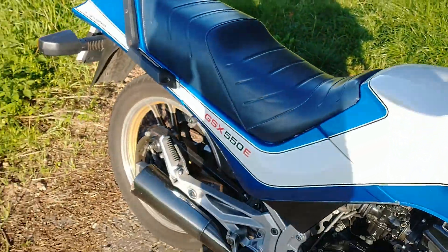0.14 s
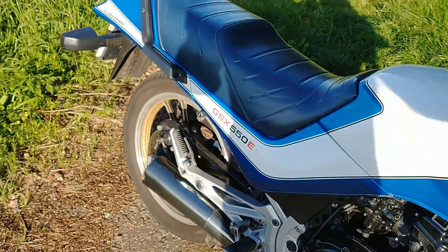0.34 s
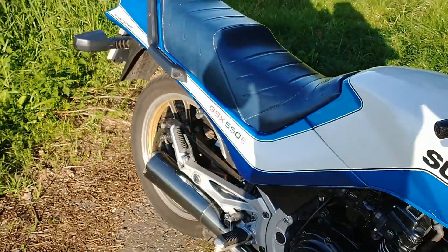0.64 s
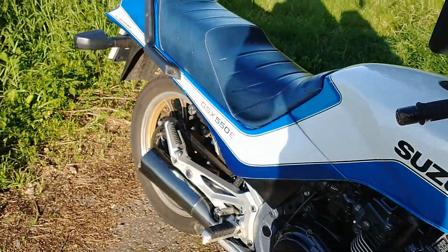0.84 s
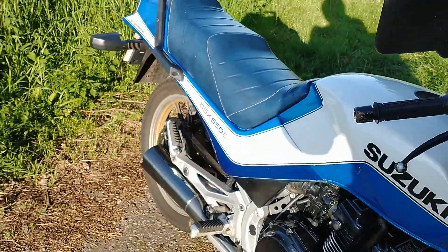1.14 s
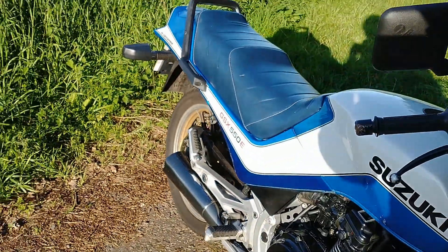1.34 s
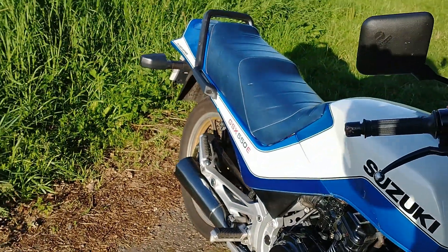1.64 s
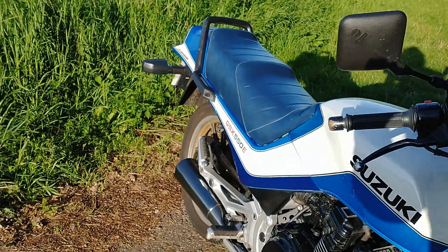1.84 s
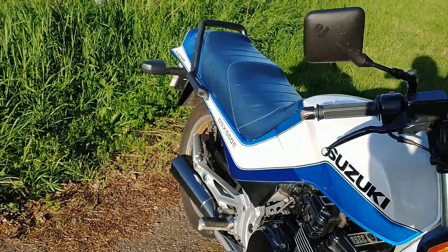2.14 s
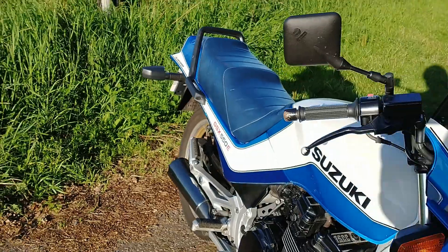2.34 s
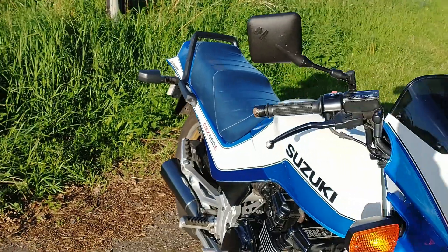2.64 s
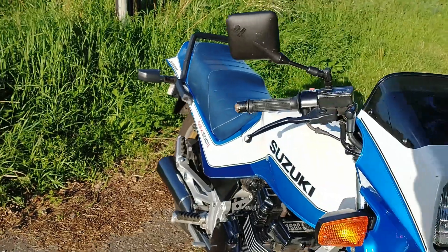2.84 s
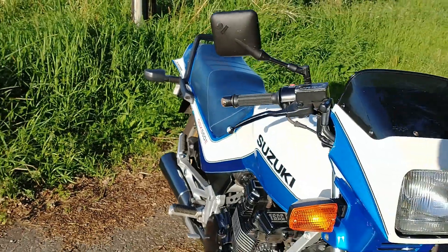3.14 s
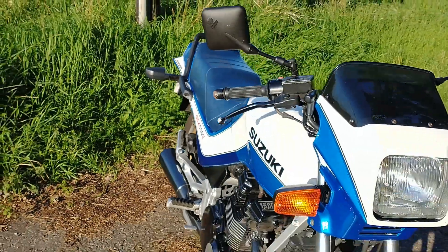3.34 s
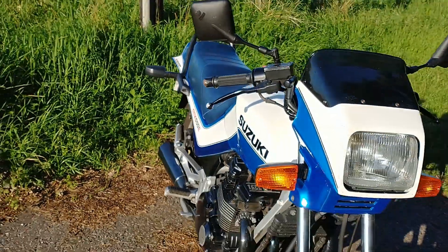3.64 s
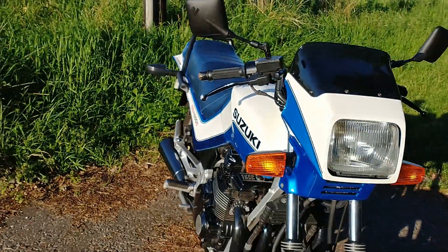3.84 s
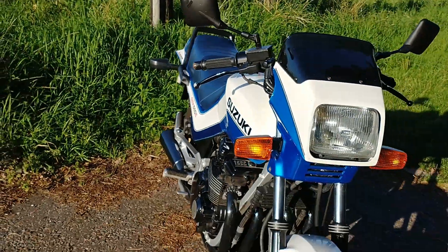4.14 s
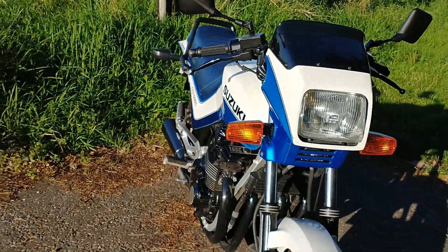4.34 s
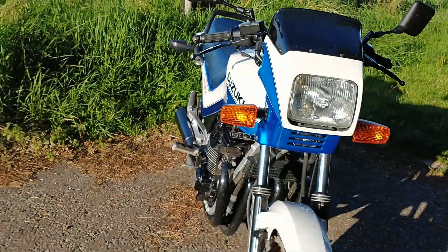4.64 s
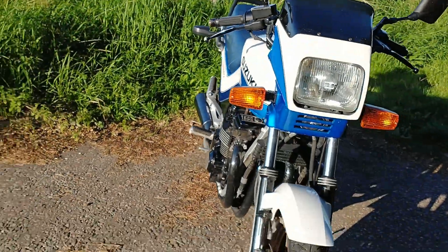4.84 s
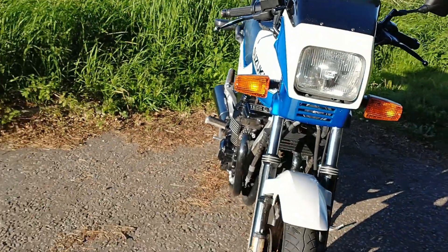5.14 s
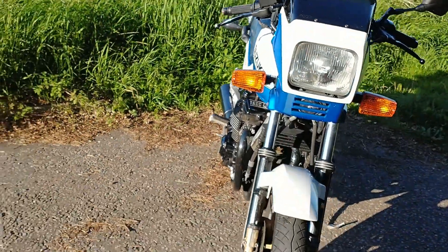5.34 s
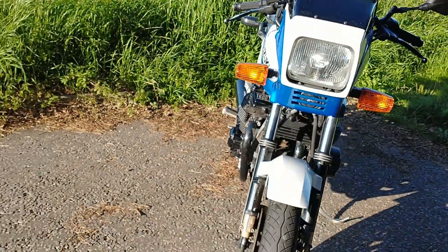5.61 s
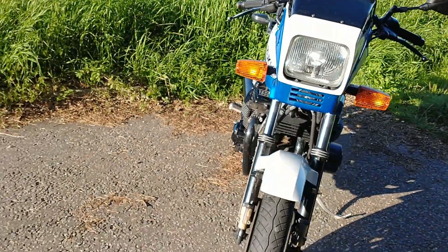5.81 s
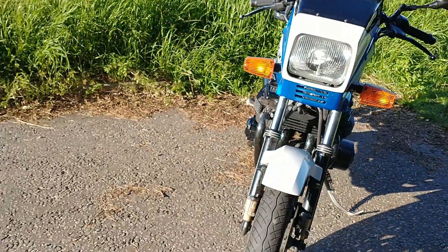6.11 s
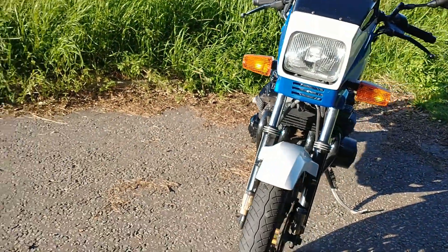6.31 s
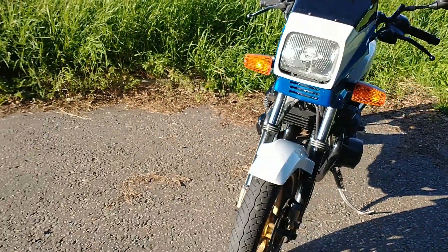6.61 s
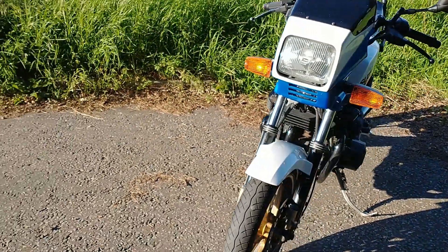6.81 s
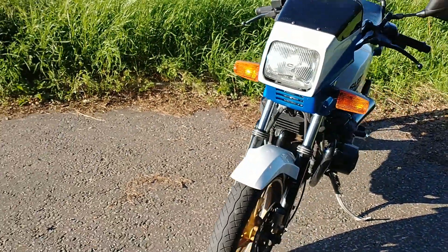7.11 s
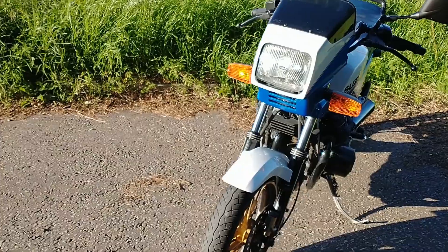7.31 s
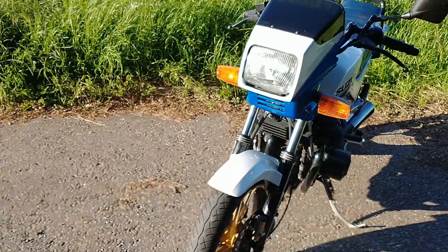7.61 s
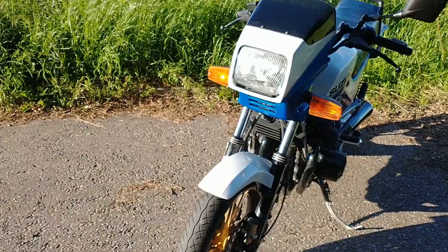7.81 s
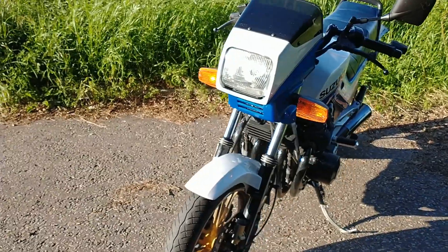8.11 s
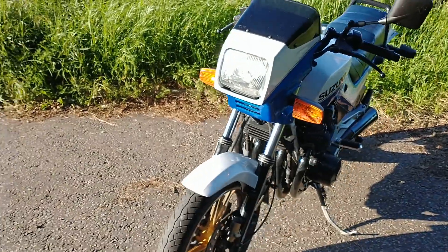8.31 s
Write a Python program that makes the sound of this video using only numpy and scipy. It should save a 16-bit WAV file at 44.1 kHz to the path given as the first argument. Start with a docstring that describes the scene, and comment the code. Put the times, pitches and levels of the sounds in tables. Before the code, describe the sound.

A four-cylinder motorcycle idles unevenly outdoors, deep exhaust throb and metallic clatter, wind buffeting early, then quieter and duller as the listener circles to the front.

```python
"""A four-cylinder motorcycle idles outdoors, heard at two hand-held ports: firings ring the exhaust pipe and gate
silencer roar, casing clatter and gas hiss; one lazy cylinder misfires about every other engine cycle.
First, beside the engine, low-passed and band-passed noise buffets the ports; the breeze dies away from 2 s.
From about 3 s the ports pass round to the front: pipe, roar and hiss sink, and the clatter changes colour.
Near 4 s gravel snaps underfoot, as short bright noise bursts; the uneven idle carries on to the end."""
import sys
import numpy as np
from scipy import signal
from scipy.fft import rfft, irfft, next_fast_len
from scipy.io import wavfile
from scipy.ndimage import uniform_filter1d, map_coordinates

SR = 44100
rng = np.random.default_rng(int(sys.argv[2]) if len(sys.argv) > 2 else 0)


def gain_from_db(level_db):
    """Convert decibel levels to linear amplitude factors (20 dB per decade)."""
    decades = np.asarray(level_db, float) / 20
    return 10 ** decades


def log_audio(samples):
    """Write samples as a 16-bit WAV file to the path given in sys.argv[1]."""
    # one column per channel
    frames = np.atleast_2d(samples).T
    # limit to full scale, then quantise
    limited = np.clip(frames, -1, 1)
    pcm = np.round(limited * 32767).astype(np.int16)
    wavfile.write(sys.argv[1], SR, pcm)


N = 373086

# idle speed hunts: t/s, engine cycles per s (a cycle is two crank turns)
IDLE_SPEED = [(0, 11.636), (.684, 11.29), (.725, 11.647), (2.47, 11.846), (2.48, 12.034), (4.653, 11.617),
              (5.021, 12.114), (5.592, 11.629), (7.559, 11.835), (8.46, 11.626)]
# odd burns of the lazy cylinder, partial or off time: t/s, strength (1 = healthy), delay/s
ODD_BURNS = [(.16, .35, .001), (.51, .64, 0), (.69, .4, .001), (.86, .72, 0), (1.03, .3, .001),
             (1.54, .45, .002), (2.05, .62, 0), (2.39, .4, .002), (2.72, .6, 0), (3.06, .4, .002),
             (3.91, .2, .002), (4.42, .35, .001), (4.59, .65, 0), (4.76, .68, 0), (5.26, .7, 0),
             (5.43, .58, 0), (5.86, .37, 0), (6.03, .3, .001), (7.22, .6, 0), (7.39, .3, .002),
             (7.73, .57, 0), (7.9, .55, 0), (8.07, .25, 0), (8.24, .47, 0), (8.41, .27, 0)]
# one bad burn of a healthy cylinder: t/s, strength, delay/s
HEALTHY_STUMBLE = (.964, .4, .002)
# mean strength per cylinder, lazy one last and set elsewhere: after a good firing, after a misfire
HEALTHY_STRENGTH = [(1, 1), (1.12, .75), (.92, .95), (0, 0)]
# time shift/s of each cylinder (+ late, - early), lazy one last; scaled by 1 - the last lazy strength
SHIFT_AFTER_LAZY_S = [-.0003, .0004, .0007, 0]
# weight of each cylinder in the gates, lazy one last: roar/dB, clatter/dB, hiss/dB (relative)
CYLINDER_WEIGHTS = [(10.5, -7, -10), (16.5, -10, -9), (13.5, -9.5, -5), (-7, -19.5, 3)]
# share of the engine's flank that faces the ports: t/s, share 0-1
FLANK_SHARE = [(0, 1), (2.9, .95), (3.3, 0.67), (3.7, .27), (4.5, 0.16), (5.5, 0.07), (7, 0.04), (7.6, 0.1),
               (8.46, 0.1)]
# pipe, clatter, hiss: level/dB beside the tail at t = 0, loss along the flank in dB per s, level/dB in front
REACH_DB = [(-18, 0.1, -28.7), (-28.5, 0.3, -42.5), (-40, 0.96, -66.5)]
# exhaust pipe, main modes: f/Hz, width/Hz, relative level/dB
PIPE_MODES = [(109, 12, 0), (84, 52, -14), (187, 40, -28)]
# exhaust pipe, upper modes, each passed twice: f/Hz, width of one pass/Hz, relative level/dB
PIPE_OVERTONES = [(195, 51, 3.5), (297, 30, 9.5), (703, 31, -17)]
# the silencer's sliding band: t/s, f/Hz, level/dB
SILENCER_BAND = [(0, 491, -45.5), (.6, 490, -44.5), (1.2, 494, -43), (1.7, 530, -44), (2.3, 539, -40),
                 (3.5, 548, -42), (5, 535, -49.5), (6.5, 525, -52.5), (7.5, 512, -57), (8.46, 515, -71)]
# clatter colour from the flank: f/Hz, relative level/dB
FLANK_COLOUR = [(140, 1), (230, -16.5), (288, -3), (447, -12), (551, -7.5), (638, -18), (940, -8.5),
                (1040, -10.5), (1550, -4), (2250, -8.5), (3160, -17.5), (4170, -10.5), (5490, -21),
                (8630, -20), (11000, -29), (14300, -70), (22000, -120)]
# clatter colour round the fairing: f/Hz, relative level/dB
FRONT_COLOUR = [(140, 4), (230, -6), (346, -6.5), (519, 1.5), (609, -6.5), (665, -0.5), (867, -8.5),
                (1560, -2.5), (2510, -15), (2940, -14.5), (3390, -25), (3970, -18.5), (5760, -35.5),
                (8210, -31), (15800, -44)]
# casing modes: f/Hz, width/Hz, lift/dB
CASING_MODES = [(684, 26, 1), (798, 8.3, 4.5), (960, 48, 4.5), (1138, 11, 5), (1510, 19, -1.5),
                (1547, 10, 3), (1914, 46, 2), (2242, 34, 5), (3245, 20, 8.5), (7260, 170, 1),
                (8120, 33, 12.5), (10400, 110, 8)]
# ringing cover plate: t/s, level/dB
PLATE_DB = [(0, -58), (3, -55), (3.8, -71), (4.9, -55.5), (5.4, -53.5), (6.3, -64), (7, -72), (8.46, -77)]
# sizzle near 4 kHz: t/s, level/dB
FINS_DB = [(0, -43), (1, -42.5), (2, -49), (3.2, -44.5), (3.6, -66), (4.5, -58), (6, -72), (8.46, -55.5)]
# rasp at the pipe's mouth: t/s, level/dB
MOUTH_DB = [(0, -49), (.4, -42.5), (.9, -39.5), (1.4, -44.5), (2.2, -45), (3, -69), (3.6, -68)]
# gas hiss colour: f/Hz, relative level/dB
HISS_COLOUR = [(5290, -36), (9000, -19), (9390, 5.5), (10200, 8), (11000, 3.5), (12300, 11.5), (13600, 8.5),
               (15100, 9), (15800, -13)]
# likeness of the ports on the flank: f/Hz, correlation 0-1
PORT_LIKENESS = [(100, .97), (700, .93), (1500, .72), (3000, .55), (6000, .45), (8000, .5), (13000, .85)]
# phase lead of the left port on the flank: f/Hz, lead/rad
LEFT_LEAD = [(300, -.1), (950, -.35), (1300, -1.2), (2300, -1.2), (3300, -2.2), (6000, -1.6), (7000, 0)]
# left port over right: f/Hz, level/dB
LEFT_OVER_RIGHT = [(200, -1), (600, 1), (2000, -1.5), (4400, 2), (8000, -0.5), (14000, -1.2)]
# gravel snaps ahead of their filter: t/s, level at onset/dB
GRAVEL_SNAPS = [(3.935, -23), (4.1417, -31.5), (4.148, -22), (4.2194, -44), (4.258, -28)]
# gusts on the ports: t/s, rumble time/s, peak rumble gain/dB, peak flap gain/dB
WIND_GUSTS = [(.095, 0.035, -30, -36), (0.143, .03, -35, -27), (.2, .04, -31, -38), (0.301, .05, -30, -30),
              (0.538, .06, -22.5, -25), (0.622, .05, -22.5, -45), (.69, .03, -28, -34),
              (0.754, 0.022, -25, -28), (1.071, .05, -28, -32), (1.145, .03, -30, -26.5),
              (1.224, .03, -32, -40), (1.374, 0.066, -37, -38), (1.477, 0.049, -33, -38),
              (1.607, .03, -27, -36), (1.66, .04, -25, -38), (1.724, .03, -31, -42)]
# wind rumble colour: f/Hz, relative level/dB
RUMBLE_COLOUR = [(25, -45), (45, -23), (90, 10), (140, -0.5), (200, -15), (300, -67)]

# the lazy cylinder alternates a strong firing with a misfire: a weak, early puff of unburnt gas
STRONG, MISFIRE, BURN_SCATTER = 1.22, .35, .09  # strengths, 1 = healthy
CYCLE_AT_START = -.885  # cycles from the lazy cylinder's first firing
MISFIRE_SLOT_EARLY_S, PUFF_EARLY_S, PUFF_SCATTER_S = .00046, .0038, .0008
SWAP_S = 5.73  # the alternation swaps over here
BREEZE_RUMBLE_DB, BREEZE_FLAP_DB, BREEZE_DROPS_S, DROP_DB_PER_S = -44, -56, 2, 12
FLAP_TIME_S = .021
TOP_HZ = 15900


def unit(x):
    """Scaled to rms 1."""
    return x / np.sqrt(np.mean(x ** 2) + 1e-20)


def along(points, hz):
    """Interpolates (Hz, value) points on a log frequency axis."""
    f, v = np.transpose(points)
    return np.interp(np.log(hz + 1), np.log(f + 1), v)


def curves(rows):
    """One value per sample for each column after the time."""
    s, *cols = np.transpose(rows)
    return [np.interp(np.arange(N) / SR, s, c) for c in cols]


def wobble(knots_per_s):
    """A smooth random curve."""
    knots = rng.standard_normal(int(N * knots_per_s / SR) + 4)
    return map_coordinates(knots, [np.arange(N) * knots_per_s / SR])


def filtered(x, response):
    """x times a complex response of frequency."""
    m = next_fast_len(N + SR // 2)
    return irfft(rfft(x, m) * response(np.fft.rfftfreq(m, 1 / SR)), m)[..., :N]


def resonance(f, hz, width):
    """One causal resonance, gain 1 at its top."""
    return 1j * f * width / (hz * hz - f * f + 1j * f * width)


def ports(pair, gain, flank=1):
    """Mixes two noises to the ports at rms 1; a larger flank makes them less alike and the phase lead greater."""
    def response(hz):
        """Alike and apart parts, for left and right."""
        u = np.arccos(along(PORT_LIKENESS, hz) ** flank) / 2
        left_over_right = np.exp(1j * flank * along(LEFT_LEAD, hz)) * gain_from_db(along(LEFT_OVER_RIGHT, hz))
        tilt = left_over_right ** np.array([[.5], [-.5]])
        return gain(hz) * tilt * np.array([[np.cos(u), np.cos(u)], [np.sin(u), -np.sin(u)]])
    return unit(filtered(pair[:, None], response).sum(axis=0))


def patchy(depth_db):
    """Two noises whose gain varies in patches over pitch and time."""
    z = signal.stft(rng.standard_normal((2, N)), nperseg=256)[2]
    field = uniform_filter1d(rng.standard_normal(z.shape[1:]), size=3, axis=0)
    field = uniform_filter1d(field, size=8, axis=1)
    return signal.istft(z * gain_from_db(depth_db * unit(field)), nperseg=256)[1][:, :N]


def puffs(at, sizes, delay_s, rise_s, fall_s, floor):
    """A gate that swells after every firing and dies away over a steady floor, at rms 1."""
    t = np.maximum(np.arange(SR // 10) / SR - delay_s, 0)
    shape = np.exp(-t / fall_s) * (1 - np.exp(-t / rise_s))
    train = np.bincount(at, sizes, N)
    return unit(floor + signal.fftconvolve(train, shape / shape.max())[:N])


def reach(row, flank):
    """Level/dB between flank, where it falls with time, and front."""
    tail, loss, front = row
    return flank * (tail - loss * np.arange(N) / SR) + (1 - flank) * front


def engine():
    """Pipe, silencer, casing, plate, fins, mouth and gas, all timed by the same firings."""
    at, cylinder, strength, late = firings()
    roar, clatter, hiss = gain_from_db(np.array(CYLINDER_WEIGHTS)[cylinder].T)
    scatter = gain_from_db(rng.standard_normal((len(at), 3)) * [2, 1.8, 1.4]).T
    flank = np.clip(curves(FLANK_SHARE)[0], 0, 1)
    pipe_db, clatter_db, hiss_db = [reach(row, flank) for row in REACH_DB]
    gate = puffs(at, clatter * scatter[1], .002, .003, .014, .9)
    out = pipe_boom(at, strength, late, scatter[0], pipe_db)
    out = out + silencer_roar(at, roar * scatter[0])
    out = out + casing_clatter(gate, flank, clatter_db)
    out = out + cover_plate(gate) + fin_sizzle(gate) + mouth_rasp(gate)
    return out + gas_hiss(at, hiss * scatter[2], flank, hiss_db)


def lazy_cylinder():
    """Slot time/s, strength and delay/s of the lazy cylinder in every cycle."""
    turned = CYCLE_AT_START + np.cumsum(curves(IDLE_SPEED)[0]) / SR
    cycle = np.arange(np.floor(turned[-1]) + 1)
    s = np.interp(cycle, turned, np.arange(N) / SR)
    misses = (cycle + (s > SWAP_S)) % 2
    chance = rng.standard_normal((len(s), 2))
    strength = np.where(misses, MISFIRE, STRONG) + BURN_SCATTER * chance[:, 0]
    late = misses * (PUFF_SCATTER_S * chance[:, 1] - PUFF_EARLY_S)
    for when, part, delay in ODD_BURNS:
        nearest = np.argmin(abs(s - when))
        strength[nearest], late[nearest] = part, delay
    return s - MISFIRE_SLOT_EARLY_S * misses, strength, late


def firings():
    """Sample, cylinder, strength, delay; after a misfire the first comes slightly early, the next two slightly late."""
    s, lazy, late = lazy_cylinder()
    # one more cycle at either end
    s = np.r_[2 * s[0] - s[1], s, 2 * s[-1] - s[-2]]
    lazy, late = np.r_[1, lazy, 1], np.r_[0, late, 0]
    count = np.arange(4 * len(s) - 3)
    chance = rng.standard_normal((len(count), 2))
    cylinder, last = (count - 1) % 4, lazy[count // 4]
    at = np.interp(count / 4, np.arange(len(s)), s) + .00004 * chance[:, 0]
    at += np.array(SHIFT_AFTER_LAZY_S)[cylinder] * (1 - last)
    good, poor = np.array(HEALTHY_STRENGTH)[cylinder].T
    healthy = poor + (good - poor) * np.clip((last - MISFIRE) / (STRONG - MISFIRE), 0, 1)
    strength = np.where(cylinder == 3, last, healthy * gain_from_db(.5 * chance[:, 1]))
    late = (cylinder == 3) * late[count // 4]
    odd = np.argmin(abs(at - HEALTHY_STUMBLE[0]))
    strength[odd], late[odd] = HEALTHY_STUMBLE[1:]
    heard = (at + late >= 0) & (at >= 0) & (at < N / SR - .01)
    return (at[heard] * SR).astype(int), cylinder[heard], strength[heard], (late[heard] * SR).astype(int)


def pipe_boom(at, strength, late, scatter, pipe_db):
    """Each firing is a soft pressure pulse that rings the pipe's modes."""
    def main_modes(f):
        """Modes of alternating sign behind a two-pole low-pass at 178 Hz."""
        modes = sum((-1) ** k * gain_from_db(db) * resonance(f, hz, w) for k, (hz, w, db) in enumerate(PIPE_MODES))
        return modes / (1 + 1j * f / 178) ** 2

    upper_modes = lambda f: sum(gain_from_db(db) * resonance(f, hz, w) ** 2 for hz, w, db in PIPE_OVERTONES)
    boom = gain_from_db(pipe_db) * unit(filtered(np.bincount(at + late, strength, N), main_modes))
    # the gas front varies, so the upper modes ring unevenly
    jitter = (.00084 * SR * rng.standard_normal(len(at))).astype(int)
    pulses = np.bincount(np.clip(at + jitter, 0, N - 1), (strength + .35) * scatter, N)
    boom += gain_from_db(pipe_db - 36.5) * unit(filtered(pulses, upper_modes))
    left = np.pad(boom, (4, 0))[:N]  # 4 samples later than right
    return np.array([left, boom]) * gain_from_db(np.array([[-.3], [.3]]))


def silencer_roar(at, sizes):
    """A band that slides with the angle; every firing rings it afresh at a chance phase."""
    hz, db = curves(SILENCER_BAND)
    start = 2 * np.pi * rng.random(len(at))
    in_phase, quadrature = [puffs(at, sizes * part, .0073, .002, .0098, 0)
                            for part in (np.cos(start), np.sin(start))]
    phase = 2 * np.pi * np.cumsum(hz) / SR
    return gain_from_db(db) * (in_phase * np.cos(phase) + quadrature * np.sin(phase))


def casing_clatter(gate, flank, clatter_db):
    """Valve gear and chain shake the casing as gated noise; the fairing shades its treble from the front."""
    lift = lambda f: 1 + sum((gain_from_db(db) - 1) * abs(resonance(f, hz, w)) ** 2 for hz, w, db in CASING_MODES)
    side_on = ports(gate * patchy(1.8), lambda f: gain_from_db(along(FLANK_COLOUR, f)) * lift(f))
    head_on = ports(gate * patchy(1.06), lambda f: gain_from_db(along(FRONT_COLOUR, f)) * lift(f), flank=.44)
    clatter = gain_from_db(clatter_db) * (np.sqrt(flank) * side_on + np.sqrt(1 - flank) * head_on)
    # loose parts knock at random, harder after a firing, and ring the casing modes
    knocks = gate ** 2 * (rng.random((2, N)) < 160 / SR) * rng.standard_normal((2, N))  # 160 per s
    modes = lambda f: sum(gain_from_db(db + along(FRONT_COLOUR, hz)) * resonance(f, hz, w) for hz, w, db in CASING_MODES)
    return clatter + gain_from_db(clatter_db - 12.5) * ports(knocks, modes, flank=.89)


def cover_plate(gate):
    """A cover plate rings: unsteady gated noise through a narrow resonance."""
    noise = gate * gain_from_db(2 * wobble(14)) * rng.standard_normal(N)
    return gain_from_db(curves(PLATE_DB)[0]) * unit(filtered(noise, lambda f: resonance(f, 2941, 75) ** 2))


def fin_sizzle(gate):
    """Sizzle: gated noise through a broad resonance."""
    noise = gate * rng.standard_normal((2, N))
    return gain_from_db(curves(FINS_DB)[0]) * ports(noise, lambda f: resonance(f, 3910, 1540) ** 2, flank=.48)


def mouth_rasp(gate):
    """Rasp at the pipe's mouth: sharply gated noise through two resonances."""
    mouth = lambda f: resonance(f, 779, 107) ** 2 + .71 * resonance(f, 980, 130) ** 2
    return gain_from_db(curves(MOUTH_DB)[0]) * unit(filtered(gate ** 2 * rng.standard_normal(N), mouth))


def gas_hiss(at, sizes, flank, hiss_db):
    """Gas spits from the exhaust joints, most at the lazy cylinder; in front, a narrower band over even hiss."""
    gate = puffs(at, sizes, .00053, .0052, .0059, .34)
    side_on = ports(gate * rng.standard_normal((2, N)), lambda f: gain_from_db(along(HISS_COLOUR, f)))
    shaded = ports(gate ** 1.3 * rng.standard_normal((2, N)), lambda f: resonance(f, 12000, 2400) ** 2)
    even = ports(rng.standard_normal((2, N)), lambda f: resonance(f, 15000, 9000) ** 2 * (f > 9000))
    head_on = .7 * shaded + .62 * even
    return gain_from_db(hiss_db) * (np.sqrt(flank) * side_on + np.sqrt(1 - flank) * head_on)


def gravel():
    """Bright snaps of a stone under a shoe: decaying noise, the same at both ports."""
    x, t = np.zeros(N), np.arange(SR // 100) / SR
    for s, db in GRAVEL_SNAPS:
        snap = gain_from_db(db - 60 * t / .0044) * rng.standard_normal(len(t))  # -60 dB in 4.4 ms
        x[round(s * SR):][:len(t)] += snap
    return filtered(x, lambda f: resonance(f, 13700, 8700) ** 2)


def wind():
    """Low buffeting noise, different at each port; sharp gusts flap higher up."""
    t = np.arange(N) / SR
    dying = gain_from_db(-DROP_DB_PER_S * np.maximum(t - BREEZE_DROPS_S, 0))
    swell = lambda s, lasts: np.exp(-((t - s) / lasts) ** 2)
    rumble_gain = gain_from_db(BREEZE_RUMBLE_DB) * dying
    flap_gain = gain_from_db(BREEZE_FLAP_DB) * dying
    for s, lasts, rumble_db, flap_db in WIND_GUSTS:
        rumble_gain += gain_from_db(rumble_db) * swell(s, lasts)
        flap_gain += gain_from_db(flap_db) * swell(s, FLAP_TIME_S)
    lumps = gain_from_db(.87 * np.array([wobble(29.4), wobble(24.3)])) * rng.standard_normal((2, 2, N))
    rumble = unit(filtered(lumps[0], lambda f: gain_from_db(along(RUMBLE_COLOUR, f))))
    flap = unit(filtered(lumps[1], lambda f: resonance(f, 165, 220) ** 2 / (1 + (f / 380) ** 4)))
    return rumble_gain * rumble + flap_gain * flap * gain_from_db(np.array([[-1.5], [1.5]]))


def scene():
    """Everything at the two ports."""
    return engine() + gravel() + wind()


def band_limit(x):
    """A steep low-pass at the top of the band."""
    return signal.sosfilt(signal.butter(12, 16930, fs=SR, output="sos"), x)


def record(dry):
    """The recorder drops the deepest bass, below about 33 Hz, and all above its band limit."""
    band = lambda hz: (hz < TOP_HZ) / (1 + (33 / (hz + 1)) ** 6)
    mix = filtered(dry, band)
    return band_limit(mix)


dry = scene()
out = record(dry)
log_audio(out)
```